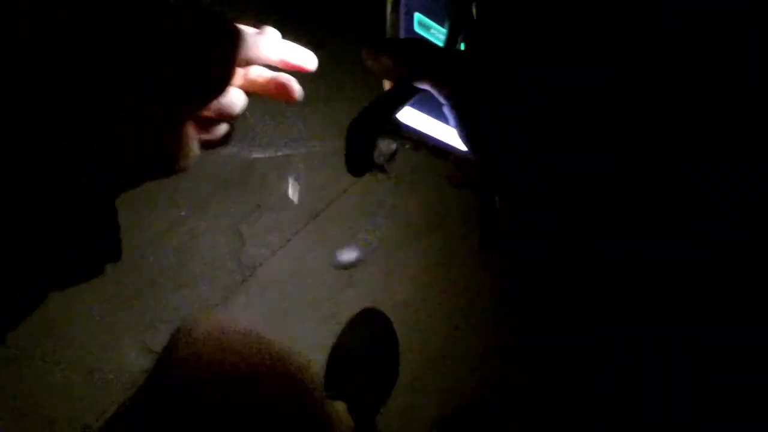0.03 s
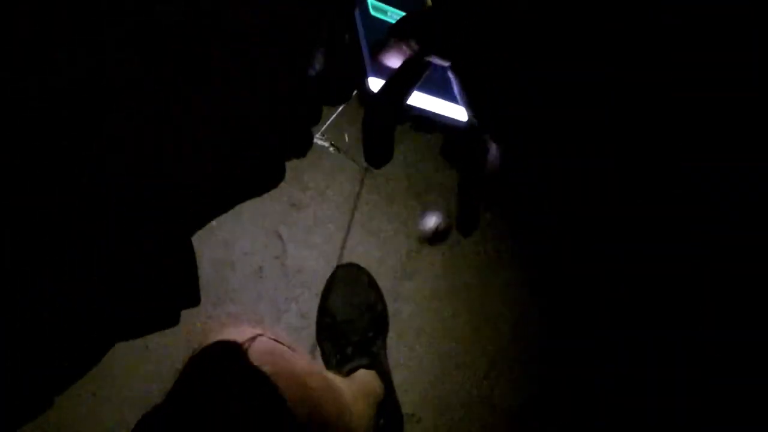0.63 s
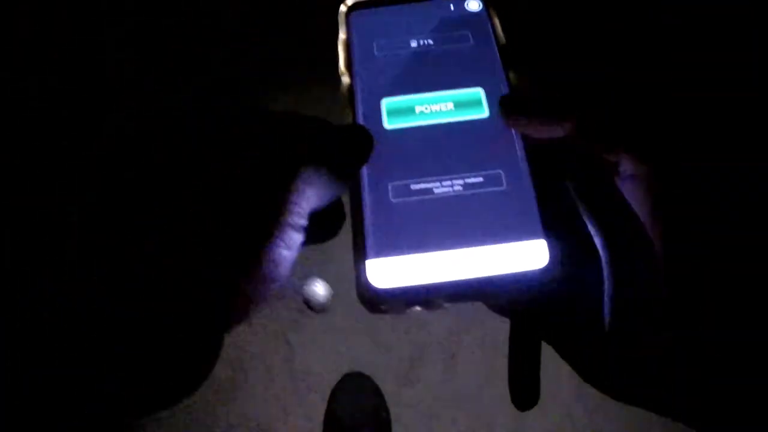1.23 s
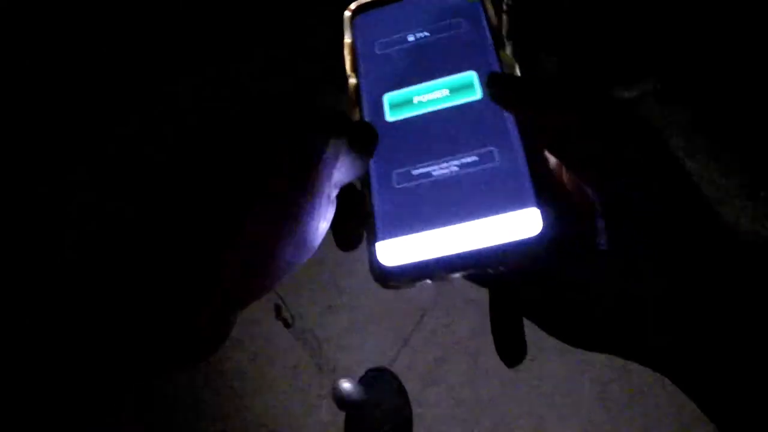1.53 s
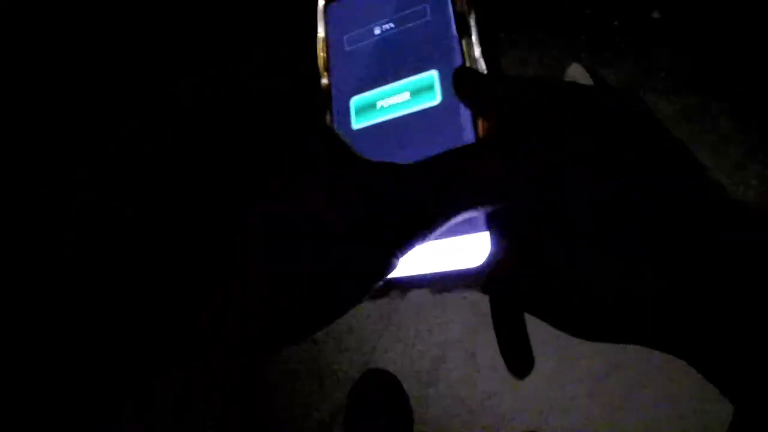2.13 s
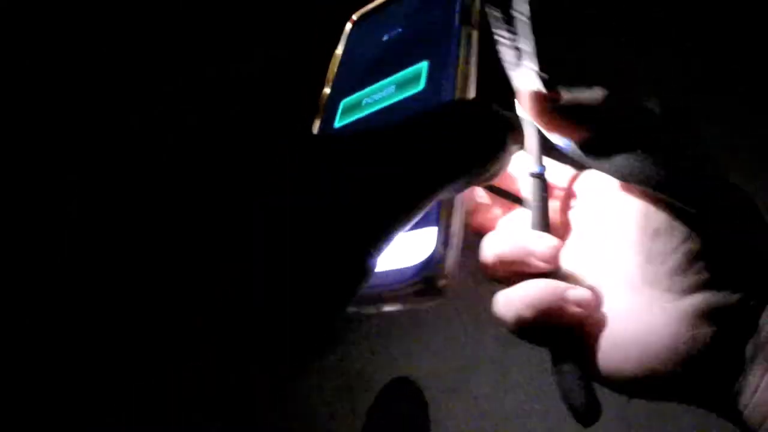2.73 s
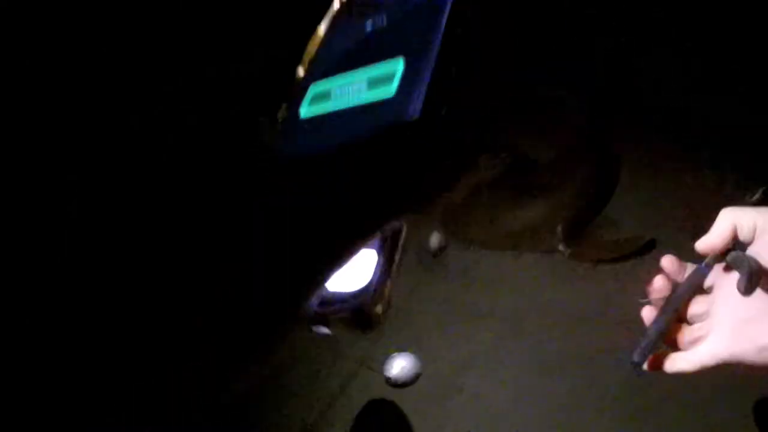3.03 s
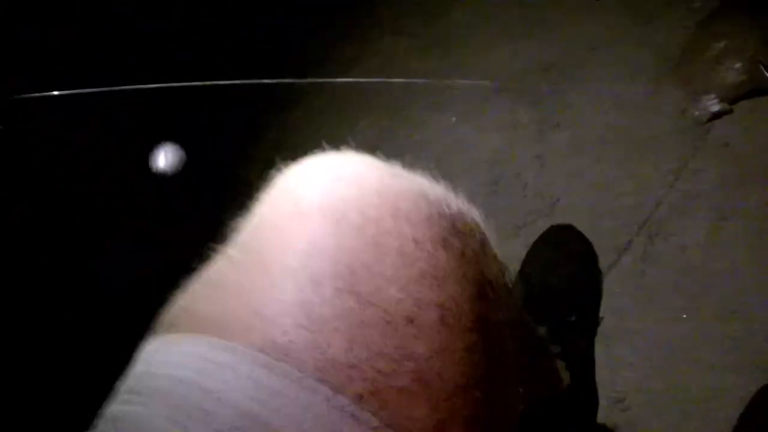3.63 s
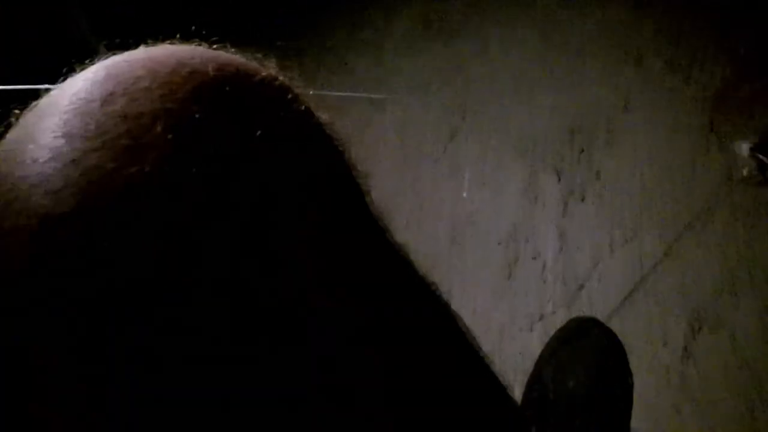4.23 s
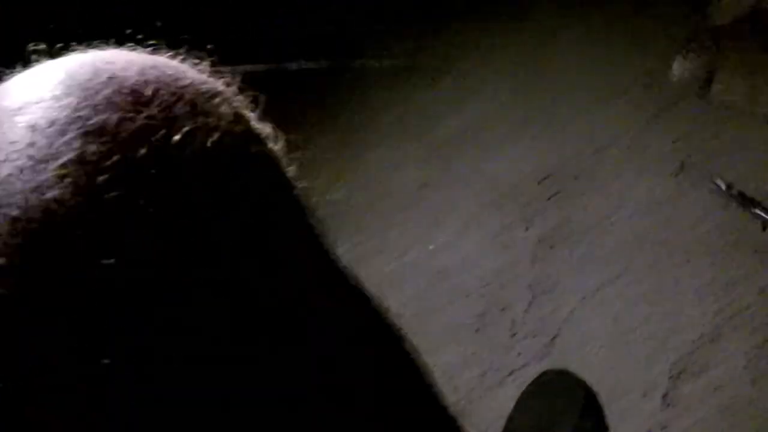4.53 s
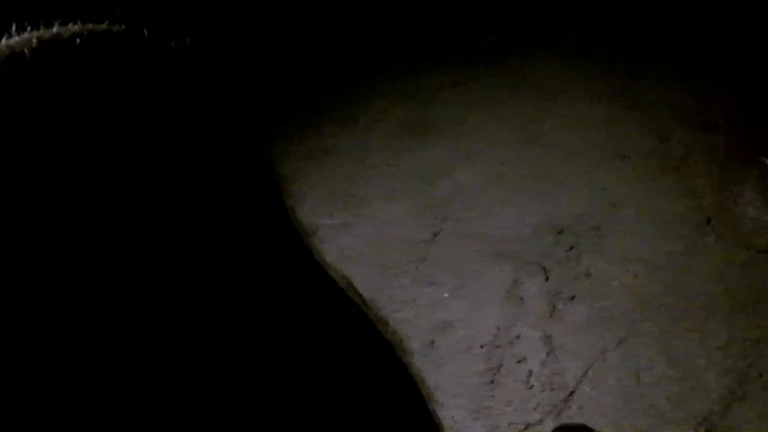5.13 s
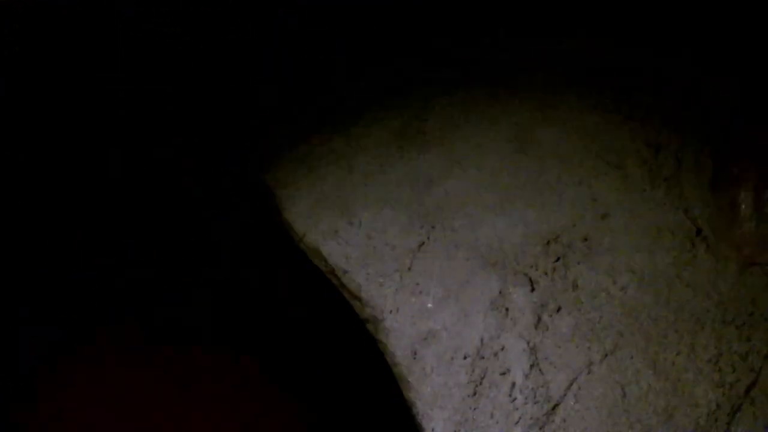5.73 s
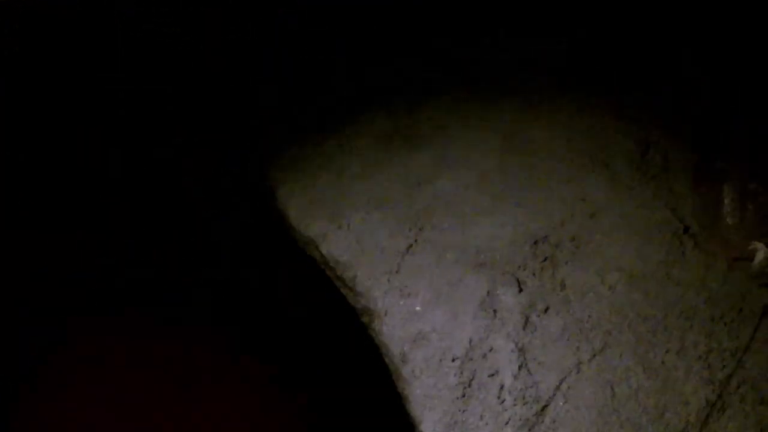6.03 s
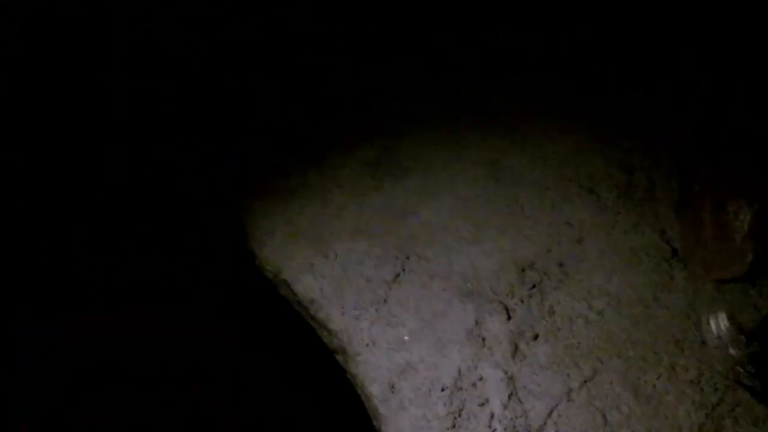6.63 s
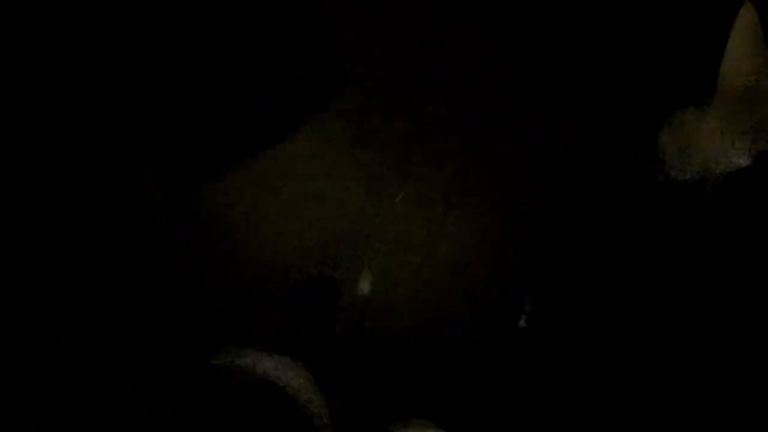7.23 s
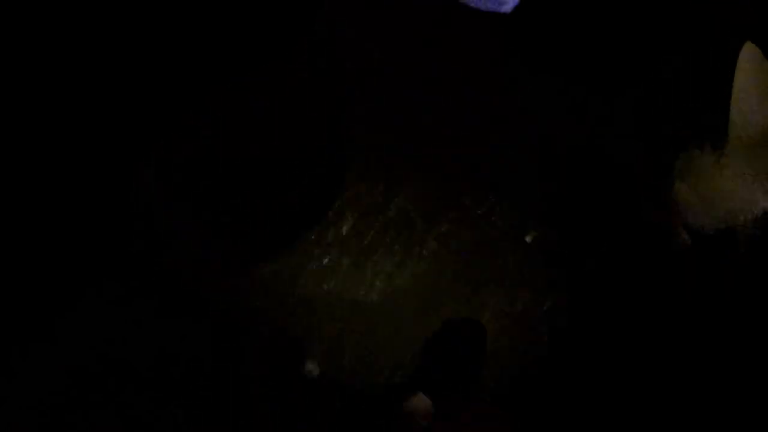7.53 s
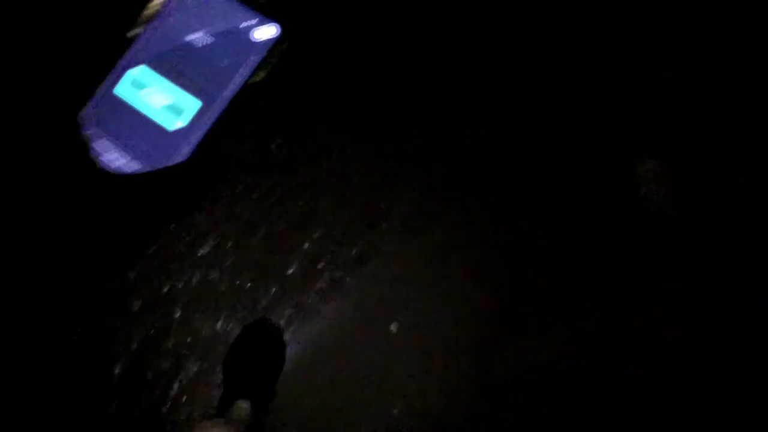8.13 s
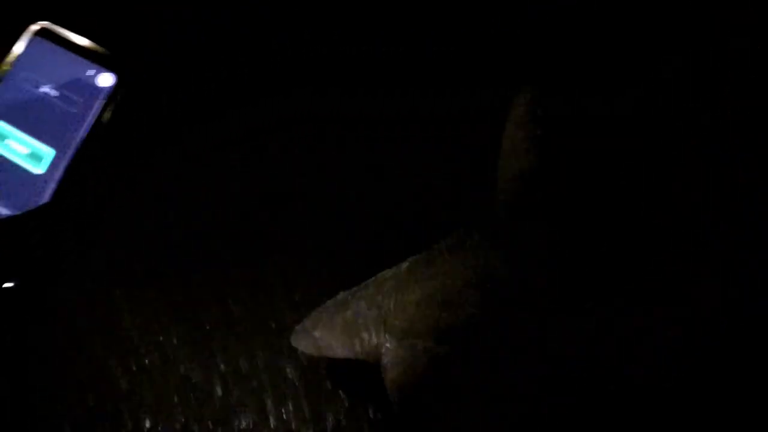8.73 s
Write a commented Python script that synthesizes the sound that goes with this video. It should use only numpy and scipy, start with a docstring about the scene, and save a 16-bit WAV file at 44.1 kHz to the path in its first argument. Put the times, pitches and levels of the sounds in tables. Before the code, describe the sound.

Surf washes steadily at night under light wind rumble, with close sleeve rustles and a few knocks of fishing gear near the end.

```python
"""Surf washes steadily beside a concrete ledge at night: breakers roar, foam bubbles burst.
Light wind eddies rumble on a body-worn camera. Sleeves rub, fishing gear slips and taps, the mount rocks;
near the end the gear knocks and scrapes on the camera's plastic case, ringing its modes.
A faint electronic whine sits on top and the gain ducks after loud knocks.
The treble drops out for an instant now and then, and the level dips briefly once."""
import sys
import numpy as np
from scipy import signal
from scipy.fft import rfft, irfft
from scipy.io import wavfile

SR = 44100
rng = np.random.default_rng(int(sys.argv[2]) if len(sys.argv) > 2 else 0)


def generate_wav(sig):
    """Save sig (samples, or channels by samples) to the path in sys.argv[1] as 16-bit PCM at SR."""
    pcm = np.round(np.clip(np.atleast_2d(sig).T, -1, 1) * 32767).astype(np.int16)
    wavfile.write(sys.argv[1], SR, pcm)


N = 396018
TIME = np.arange(N) / SR


def sea():
    """Breakers roar, water washes over rocks, foam bubbles burst; wash and spray follow the swell."""
    # One long wave builds and drains. Each row: time in seconds, roar level in dB, foam level in dB.
    wave = [(0.0, -57, -60), (0.7, -57.5, -61.5), (1.9, -55.5, -54), (2.6, -52, -53), (3.1, -54, -56.5),
            (4.1, -51, -52.5), (4.85, -47, -52.5), (5.88, -52.5, -59), (6.73, -53, -57.5),
            (7.08, -56, -61.5), (7.48, -59, -57.5), (7.73, -54.5, -52.5), (8.13, -54.5, -58),
            (8.4, -53, -55.5), (8.65, -56.5, -57.5), (8.98, -54, -54)]
    roar_db, foam_db = in_time(wave)
    usual_roar_db, usual_foam_db = -54.5, -57
    roar_rise_db = roar_db - usual_roar_db
    foam_rise_db = foam_db - usual_foam_db
    surge = from_db(0.7 * drift(21))
    roar = breakers(usual_roar_db + 0.46, roar_rise_db)
    wash_db = usual_foam_db + 1 + 0.84 * foam_rise_db + 0.73 * drift(22)
    spray_db = usual_foam_db - 12 + 0.62 * foam_rise_db + 0.47 * roar_rise_db
    # Spectra of wash, foam and fine spray. Each row: frequency in Hz, relative density in dB.
    wash_spectrum = [(900, -9), (1280, -8.5), (1650, 1.5), (1950, -1), (2350, 1), (2700, -2), (3000, -7.5),
                     (3600, -14)]
    foam_spectrum = [(2700, -7.5), (3000, -4), (3280, 3.5), (3600, -3.5), (3950, -8.5), (4750, -11.5),
                     (5400, -6.5), (6200, -7.5), (6750, -9), (7100, -24), (9000, -39)]
    spray_spectrum = [(6000, -16), (6900, -1), (7400, 2.5), (7900, -4), (8500, -9), (9500, -6), (10500, -9),
                      (11500, -13.5), (13500, -17.5), (15000, -23), (15800, -40)]
    wash = from_db(wash_db) * coloured(grains(per_s=16000, spread_db=3.2), wash_spectrum)
    foam = from_db(foam_db - 0.5) * coloured(grains(per_s=22000, spread_db=2.1), foam_spectrum)
    spray = from_db(spray_db) * coloured(grains(per_s=22000, spread_db=1.6), spray_spectrum)
    return surge * (roar + wash + foam + spray)


def breakers(base_db, rise_db):
    """Each band of the roar churns on its own; the low middle swells most with the wave."""
    # Roar spectrum. Each row: frequency in Hz, relative density in dB.
    spectrum = [(90, -9), (160, -5), (260, 0), (370, 0), (480, -3.5), (700, -4.5), (950, -6.5), (1250, -13),
                (1800, -12.5)]
    # Churning bands. Each row: lower and upper edge in Hz, share of the wave's swing, churn in dB.
    bands = [(40, 168, 0.84, 1), (170, 289, 0.91, 1.5), (291, 380, 1.06, 1.7), (381, 480, 1.12, 1.8),
             (483, 640, 1.09, 1.4), (642, 904, .95, 1.2), (904, 3000, .8, .6)]
    rush = [coloured(rng.standard_normal(N), spectrum) for _ in range(2)]
    out = np.zeros(N)
    for k, (low_hz, high_hz, share, churn_db) in enumerate(bands):
        band = signal.butter(3, [low_hz, high_hz], "band", fs=SR, output="sos")
        level_db = base_db + share * rise_db + churn_db * drift(8.6)
        out += from_db(level_db) * signal.sosfilt(band, rush[k % 2])   # neighbours are uncorrelated
    return out


def hollows(relative_width=0.11):
    """A narrow band of the sea's rush swells and fades with a hollow colour."""
    # Each row: centre in seconds, length in seconds, pitch in Hz, level in dB.
    swells = [(1.3, 0.62, 6100, -65), (3.7, 1.3, 6060, -60), (4.1, .5, 3230, -55.5),
              (8.6, 2.1, 1600, -56.5), (4.05, .16, 6300, -57), (4.6, .9, 7450, -64), (8.45, .12, 5600, -57)]
    out = np.zeros(N)
    for centre_s, length_s, hz, db in swells:
        edges_hz = [hz * (1 - relative_width / 2), hz * (1 + relative_width / 2)]
        band = signal.butter(2, edges_hz, "band", fs=SR, output="sos")
        rush = rms_one(signal.sosfilt(band, rng.standard_normal(N)))
        out += from_db(db) * swell(centre_s, length_s) * rush
    return out


def knocks(rattle_db=-48, rattle_t60_s=0.064, node_depth_db=20, node_width_oct=0.14, max_fall_db=41):
    """Gear rings the case: the struck spot weights the modes, and a faint rattle follows contact."""
    # Plastic case modes. Each row: frequency in Hz, relative level in dB, undamped t60 in seconds.
    case_modes = [(283, 2, 0.044), (584, -2, .012), (783, -3.5, 0.041), (873, -6.5, .029),
                  (995, 0.5, 0.024), (1272, -1.5, 0.014), (1428, -1.5, 0.015), (1910, -11.5, 0.077),
                  (2140, 3.6, 0.021), (2441, 2.3, .024), (2665, -5.7, 0.04), (2900, -1, .015),
                  (3310, -14.6, 0.031), (3612, -7.5, .018), (4090, -15, 0.033), (5168, -9, 0.025),
                  (5620, -13, .037), (6500, -6.5, 0.019), (7220, -11, 0.016), (8200, -19, .019),
                  (9840, -17, .009), (12800, -27, .004)]
    # Each row: start in seconds, strength in dB, favoured pitch in Hz, fall from it in dB per octave,
    # share of the ring time left by the grip, pitch with a node at the spot in Hz.
    strikes = [(7.0504, -6, 2626, 20, 1.27, 1216), (7.0532, -12.2, 940, 67, 1.1, 3726),
               (7.0545, -15, 3149, 14, .63, 5684), (7.6226, -11.5, 3740, 12, 0.42, 6019),
               (7.6287, -19.1, 1439, 8.5, 0.57, 874), (7.6485, -32, 2200, 9, .4, 1000),
               (7.6598, -27.5, 2400, 9, .4, 1000), (7.6815, -27, 3000, 14, .4, 1000),
               (7.703, -22.5, 1900, 17, .4, 1000), (7.7185, -23.5, 1400, 19, 0.59, 2400),
               (7.743, -29, 2300, 12, .4, 1000), (8.32526, -16, 805, 42, 1.4, 3655),
               (8.32816, -11.2, 1517, 10, .34, 2250), (8.33368, -29, 2232, 11, .62, 953),
               (8.4557, -23, 835, 19, 1, 1200), (8.4681, -25.5, 1700, 10, .9, 1000),
               (8.588, -18.5, 1436, 8, 0.87, 1582), (8.5886, -13.5, 2669, 7.5, .58, 2378),
               (8.62796, -26.5, 1825, 6, .63, 1673), (8.6797, -13, 1790, 6, 0.53, 1903),
               (8.69365, -26, 604, 5.5, 0.75, 1397)]
    out, age_s = np.zeros(N + SR), TIME[:SR // 6]
    hz, mode_db, t60_s = np.transpose(case_modes)
    # A mode builds up over about a cycle and radiates only around its own pitch.
    bands = [signal.butter(1, [f / 1.6, f * 1.6], "band", fs=SR) for f in hz]
    for start_s, db, spot_hz, fall_db_per_oct, ring_share, node_hz in strikes:
        node_db = node_depth_db * np.exp(-(np.log2(hz / node_hz) / node_width_oct) ** 2)
        fall_db = np.minimum(fall_db_per_oct * np.abs(np.log2(hz / spot_hz)), max_fall_db)
        strength = from_db(db + mode_db - node_db - fall_db)
        decay = from_db(-60 * np.minimum(age_s / (t60_s[:, None] * ring_share), 4))
        modes = np.sin(2 * np.pi * hz[:, None] * age_s) * decay
        ring = strength @ np.array([signal.lfilter(b, a, mode) for (b, a), mode in zip(bands, modes)])
        contact = from_db(rattle_db - 60 * age_s / rattle_t60_s) * rng.standard_normal(len(age_s))
        contact[0] = 1   # the blow itself
        at = int(start_s * SR)
        out[at:at + len(age_s)] -= signal.fftconvolve(contact, ring)[:len(age_s)]
    return out[:N]


def taps(low_cut_hz=630):
    """Small pieces of tapped gear each ring one short note and radiate no bass."""
    # Each row: start in seconds, pitch in Hz, strength in dB, t60 in seconds.
    notes = [(.437, 2220, -38, 0.034), (.483, 3300, -33.5, 0.03), (1.9588, 1800, -33, .012),
             (7.0507, 6840, -24, 0.0062), (7.0535, 4080, -24, .014), (7.334, 2480, -32, 0.037),
             (7.6229, 1420, 3, 0.0052), (7.6229, 7340, -16, .007), (7.6232, 8450, -19, .008),
             (8.328, 5200, -31, 0.0073)]
    low_cut = signal.butter(2, low_cut_hz, "high", fs=SR, output="sos")
    return signal.sosfilt(low_cut, damped_notes(notes))


def bumps(t60_cycles=7.2, max_t60_s=0.38):
    """The soft camera mount rocks for a few cycles when nudged."""
    # Each row: start in seconds, frequency in Hz, strength in dB.
    nudges = [(.131, 135, -34.5), (.27, 150, -37), (.285, 19, -32), (.467, 124, -31), (.5, 110, -34),
              (3.26, 46, -38), (3.319, 94, -33.5), (3.347, 87, -34), (3.385, 160, -33), (3.49, 110, -36),
              (3.606, 180, -33.5), (3.655, 150, -34), (7.16, 230, -30.5), (7.18, 102, -28),
              (7.203, 110, -31), (7.29, 88, -33), (7.5, 15, -31), (7.616, 100, -31.5), (7.728, 130, -35),
              (7.78, 20, -26), (8.115, 45, -34), (8.19, 70, -34), (8.215, 200, -35), (8.28, 45, -32),
              (8.338, 92, -25), (8.365, 130, -30), (8.372, 15.6, -22), (8.456, 160, -33), (8.845, 34, -32),
              (8.908, 177, -30), (8.914, 58, -31)]
    return damped_notes([(s, hz, db, min(t60_cycles / hz, max_t60_s)) for s, hz, db in nudges])


def scrapes():
    """Hard plastic drags over the case in sparse, gritty slips."""
    # Each row: centre in seconds, length in seconds, level in dB.
    strokes = [(7.637, 0.025, -38.5), (7.668, .018, -37.5), (7.684, .02, -35.5), (7.709, 0.036, -32.5),
               (7.738, 0.029, -38.5), (8.477, 0.024, -46), (8.508, 0.031, -50)]
    # Grit spectrum. Each row: frequency in Hz, relative density in dB.
    spectrum = [(300, -22), (900, -8), (1450, 1), (1750, 9), (1930, -5), (2150, 10.5), (2600, -3),
                (3000, 4), (3450, 5), (3900, -12), (4500, -9), (5500, -2.5), (6600, -22), (7600, -11),
                (8500, -15), (9500, -30), (11500, -28.5), (15000, -46), (16000, -60)]
    return rubbing(strokes, spectrum, per_s=900, spread_db=3.0)


def rasps(relative_width=0.16):
    """A dragged edge catches; its slips ring one narrow resonance that slides with the contact."""
    # Each row: centre in seconds, length in seconds, start and end pitch in Hz, level in dB.
    drags = [(1.976, .034, 3000, 6600, -45), (7.674, .02, 3100, 3450, -39), (7.704, .02, 3350, 2900, -37),
             (7.724, .045, 2150, 2120, -37.5), (7.714, .052, 7300, 7800, -48.5)]
    out, slips = np.zeros(N), grains(per_s=1000, spread_db=2.5)
    for centre_s, length_s, start_hz, end_hz, db in drags:
        hz = np.interp(TIME, [centre_s - length_s / 2, centre_s + length_s / 2], [start_hz, end_hz])
        carrier = np.exp(2j * np.pi * np.cumsum(hz) / SR)
        ring_s = 1 / (np.pi * relative_width * start_hz)
        baseband = smoothed(smoothed(slips / carrier, ring_s), ring_s)
        ring = rms_one((baseband * carrier).real)
        out += from_db(db) * swell(centre_s, length_s, order=4) * ring
    return out


def tackle():
    """Line and tackle zip through the fingers; the gear gives a fine, bright crinkle."""
    # Strokes. Each row: centre in seconds, length in seconds, level in dB.
    slips = [(.484, 0.005, -38), (.492, 0.042, -47), (1.961, 0.004, -41.5), (1.974, 0.034, -42.5),
             (2.885, 0.033, -52), (4.537, 0.032, -44), (7.221, .008, -49), (7.26, 0.048, -59),
             (7.345, 0.014, -46.5), (7.412, 0.02, -46.5)]
    crinkles = [(7.26, 0.084, -65), (7.41, .07, -63)]
    # Their spectra. Each row: frequency in Hz, relative density in dB.
    zip_spectrum = [(800, -20), (1700, 4.5), (3300, 5.5), (4300, 0), (6300, 3), (8000, -9.5), (11000, -14),
                    (15000, -31)]
    crinkle_spectrum = [(8000, -6), (9800, 2), (11000, -6), (13500, -5), (15000, -13), (16000, -35)]
    zipping = rubbing(slips, zip_spectrum, per_s=3000, spread_db=3.5)
    return zipping + rubbing(crinkles, crinkle_spectrum, per_s=390, spread_db=4.0)


def sleeves():
    """Cloth brushes past in dense, tiny slips."""
    # Each row: centre in seconds, length in seconds, level in dB.
    brushes = [(.02, .06, -54), (.145, 0.048, -52.5), (.31, 0.075, -51), (1.05, 0.13, -55),
               (2.56, .16, -55), (3.33, 0.087, -45.5), (3.65, 0.13, -48), (4.36, 0.16, -51),
               (4.74, 0.074, -47), (5.02, 0.14, -45), (7.31, 0.36, -50), (8.18, 0.27, -47.5),
               (8.37, 0.18, -42.5), (8.48, 0.11, -42.5), (8.92, 0.12, -49)]
    # Cloth spectrum. Each row: frequency in Hz, relative density in dB.
    spectrum = [(200, -5), (600, -6.5), (1200, -10), (1800, -2.5), (2400, 4.5), (3000, -5), (4000, -13.5),
                (6000, -18), (9000, -37), (15000, -52)]
    return rubbing(brushes, spectrum, per_s=5000, spread_db=3.5)


def wind(breeze_db=-55.5, wander_db=0.96, lumps_db=1.54):
    """Eddies at the microphone port give a lumpy rumble: a wandering breeze with gusts on top."""
    # Each row: centre in seconds, length in seconds, level in dB.
    gusts = [(.36, 0.3, -56.5), (1.42, 0.22, -60), (2.7, .6, -64), (4.6, 1.2, -60), (5.545, 0.074, -53),
             (7.748, 0.3, -55.5), (8.368, 0.23, -47), (8.95, 0.16, -55)]
    # Buffeting spectrum. Each row: frequency in Hz, relative density in dB.
    spectrum = [(15, 5), (30, 0.5), (50, -5), (100, -2), (160, -5), (260, -11), (500, -43)]
    breeze = from_db(breeze_db + wander_db * drift(2.5))
    lumps = from_db(lumps_db * drift(13))
    return (breeze + envelope(gusts)) * lumps * coloured(rng.standard_normal(N), spectrum)


def whine():
    """The electronics give a thin, steady tone with two side tones."""
    # Each row: frequency in Hz, rms level in dB.
    tones = [(14146, -90), (14206, -85), (14266, -98)]
    return sum(from_db(db) * np.sqrt(2) * np.sin(2 * np.pi * hz * TIME) for hz, db in tones)


def dip(x, centre_s=6.995, length_s=0.035, depth_db=28):
    """The level dips briefly just before the first knock."""
    return x * from_db(-depth_db * swell(centre_s, length_s, order=4))


def dropouts(x, above_hz=4300):
    """Now and then the treble drops out for an instant."""
    # Each row: centre in seconds, length in seconds, loss in dB.
    gaps = [(0.334, 0.022, 7), (1.353, 0.032, 15), (1.895, .018, 6), (2.17, .02, 7), (2.26, .02, 9),
            (3.005, .018, 5), (3.15, .018, 5), (3.605, .018, 5), (4.745, .036, 15), (5.52, .022, 10),
            (5.735, .018, 7), (7.175, .034, 18), (7.484, 0.018, 12), (8.722, .014, 16)]
    lows = signal.sosfiltfilt(signal.butter(4, above_hz, fs=SR, output="sos"), x)
    loss_db = sum(db * swell(centre_s, length_s, order=4) for centre_s, length_s, db in gaps)
    return lows + (x - lows) * from_db(-loss_db)


def gain_control(x, threshold_db=-22.5, duck_share=0.77, attack_s=0.031, hold_fall_db_per_s=47):
    """The gain sinks by a share of the held peak above threshold, then recovers."""
    level_db = 10 * np.log10(smoothed(x[0] ** 2, 0.02) + 1e-12)
    over_db = np.maximum(level_db - threshold_db, 0)
    ramp_db = hold_fall_db_per_s * TIME
    held_db = np.maximum.accumulate(over_db + ramp_db) - ramp_db
    return x * from_db(-duck_share * smoothed(held_db, attack_s))


def rubbing(strokes, spectrum, per_s, spread_db):
    """Friction: a stream of tiny slips that swells with each stroke."""
    return envelope(strokes) * coloured(grains(per_s, spread_db), spectrum)


def damped_notes(rows):
    """Each touch starts one sine that builds up within a cycle and soon dies."""
    out = np.zeros(N)
    for start_s, hz, db, t60_s in rows:
        at = int(start_s * SR)
        age_s = TIME[at:at + SR] - TIME[at]
        rise = np.sin(np.pi / 2 * np.minimum(age_s * hz, 1)) ** 2
        decay = from_db(db - 60 * np.minimum(age_s / t60_s, 3))
        out[at:at + SR] += rise * np.sin(2 * np.pi * hz * age_s) * decay
    return out


def grains(per_s, spread_db):
    """Random tiny impulses of uneven size."""
    sizes = from_db(spread_db * np.minimum(rng.exponential(1, N), 4))
    return sizes * rng.choice([-1, 1], N) * (rng.random(N) < per_s / SR)


def coloured(x, spectrum):
    """Give x a spectrum that falls away beyond its ends; rms 1."""
    hz, db = np.transpose(spectrum)
    bin_hz = np.maximum(np.fft.rfftfreq(N, 1 / SR), 1)
    skirts = 1 / np.sqrt((1 + (hz[0] / bin_hz) ** 6) * (1 + (bin_hz / hz[-1]) ** 8))
    shape = from_db(np.interp(np.log(bin_hz), np.log(hz), db))
    return rms_one(irfft(rfft(x) * skirts * shape, N))


def drift(rate_hz):
    """Slow random wander; rms 1."""
    hop, settle = 40, 2000
    pole = np.exp(-2 * np.pi * rate_hz * hop / SR)
    noise = rng.standard_normal(N // hop + settle + 2)
    slow = signal.lfilter([1], [1, -2 * pole, pole * pole], noise)[settle:]
    return np.interp(np.arange(N) / hop, np.arange(len(slow)), rms_one(slow))


def swell(centre_s, length_s, order=2):
    """A smooth rise and fall; a higher order is squarer."""
    out = np.zeros(N)
    near = slice(*np.searchsorted(TIME, [centre_s - 2 * length_s, centre_s + 2 * length_s]))
    out[near] = np.exp(-np.abs(2 * (TIME[near] - centre_s) / length_s) ** order)
    return out


def envelope(rows):
    """Sum of swells, each at its own level."""
    return sum(from_db(db) * swell(centre_s, length_s) for centre_s, length_s, db in rows)


def in_time(rows):
    """Each column of a curve table at every sample."""
    times_s, *columns = np.transpose(rows)
    return [np.interp(TIME, times_s, column) for column in columns]


def smoothed(x, lag_s):
    """One-pole lag."""
    pole = np.exp(-1 / (lag_s * SR))
    return signal.lfilter([1 - pole], [1, -pole], x)


def from_db(db):
    """Decibels to gain."""
    return np.exp(np.asarray(db) * np.log(10) / 20)


def rms_one(x):
    """Scale to unit power."""
    return x / np.sqrt(np.mean(x ** 2) + 1e-20)


def scene():
    """Handling noises close by, sea and wind all round; mono."""
    handling = sleeves() + scrapes() + rasps() + tackle() + knocks() + taps() + bumps()
    shore = sea() + hollows() + wind()
    return dropouts(dip(shore + handling))[None]


def record(dry):
    """The electronics add a whine, duck after loud knocks and cut the top."""
    cutoff_hz = 16500
    top_cut = signal.cheby1(12, 0.1, cutoff_hz, fs=SR, output="sos")
    ducked = gain_control(dry + whine())
    return signal.sosfilt(top_cut, np.clip(ducked, -1, 1))


dry = scene()
out = record(dry)
generate_wav(out)
```